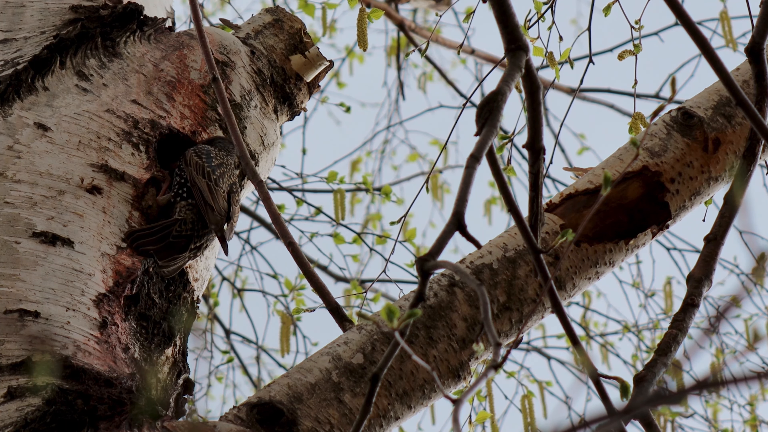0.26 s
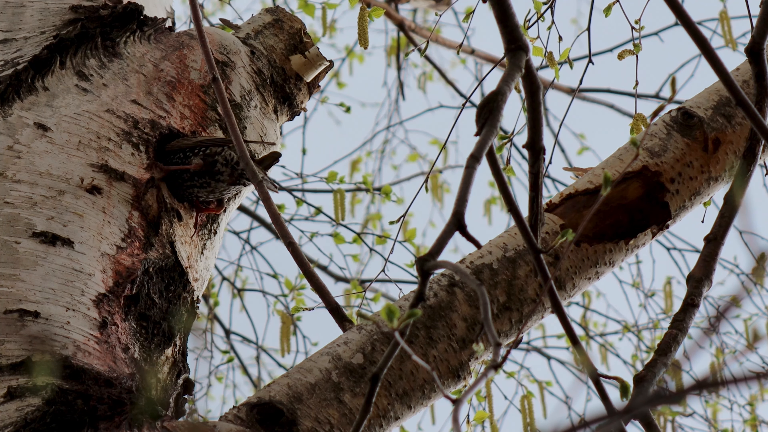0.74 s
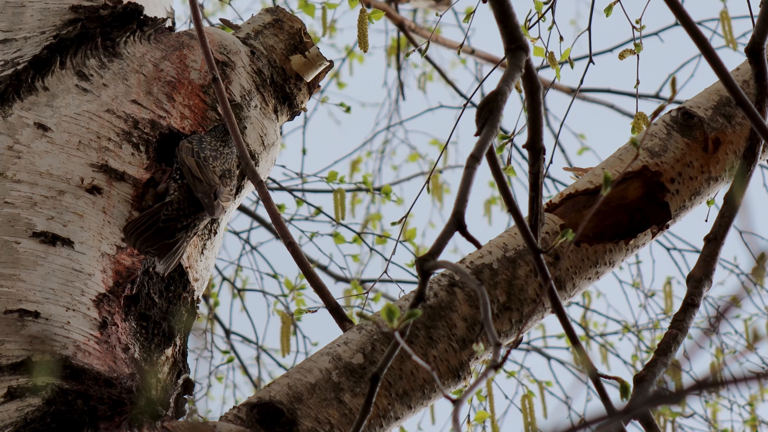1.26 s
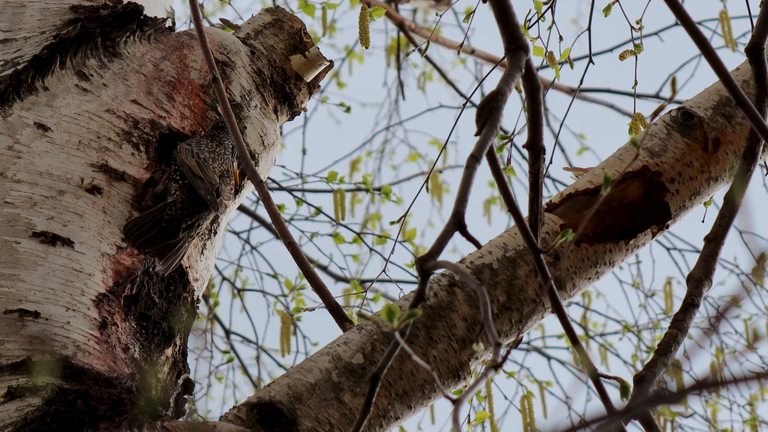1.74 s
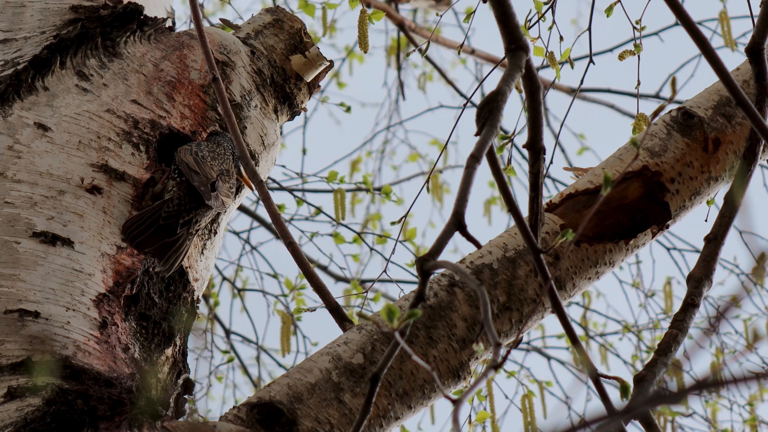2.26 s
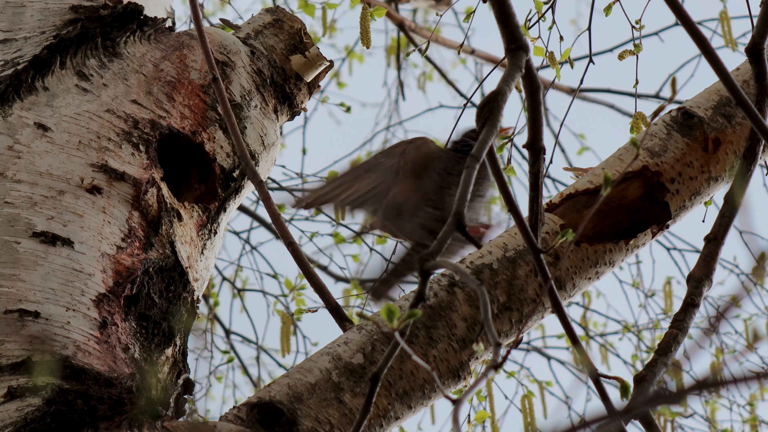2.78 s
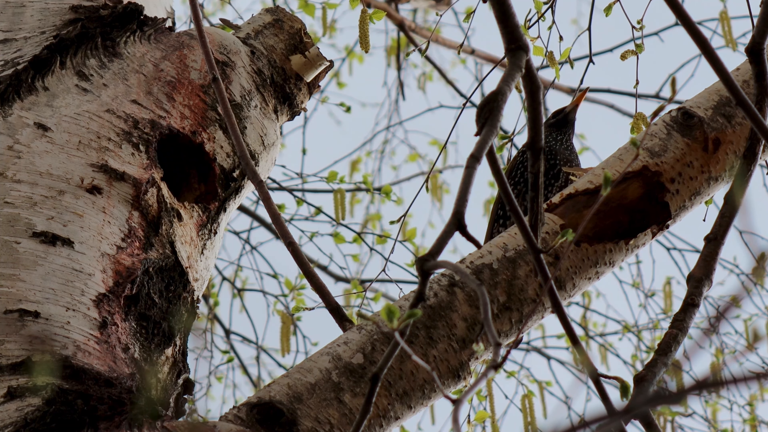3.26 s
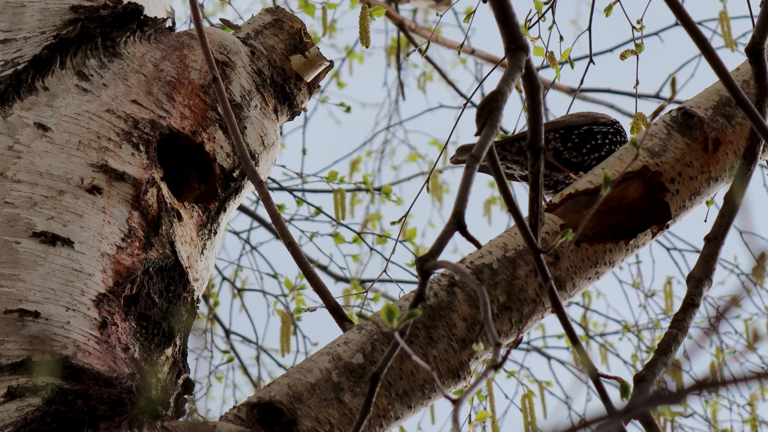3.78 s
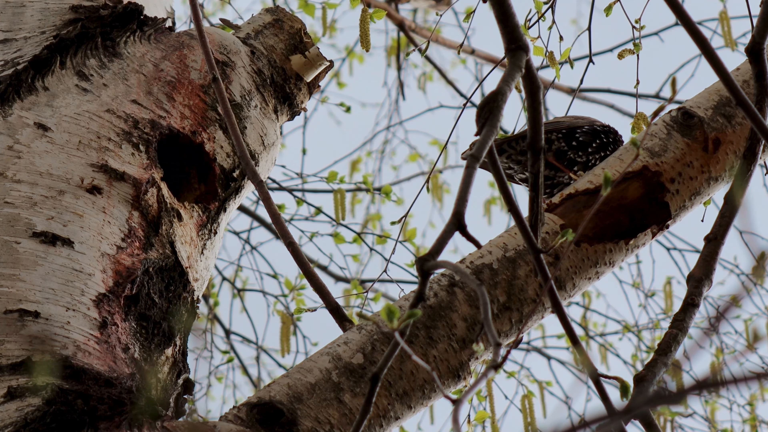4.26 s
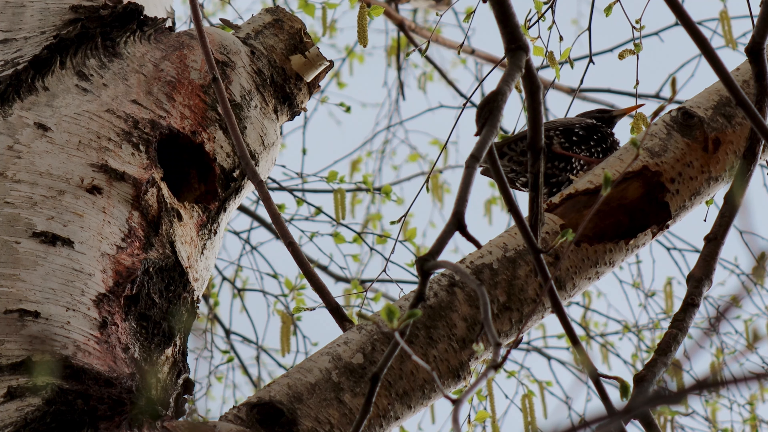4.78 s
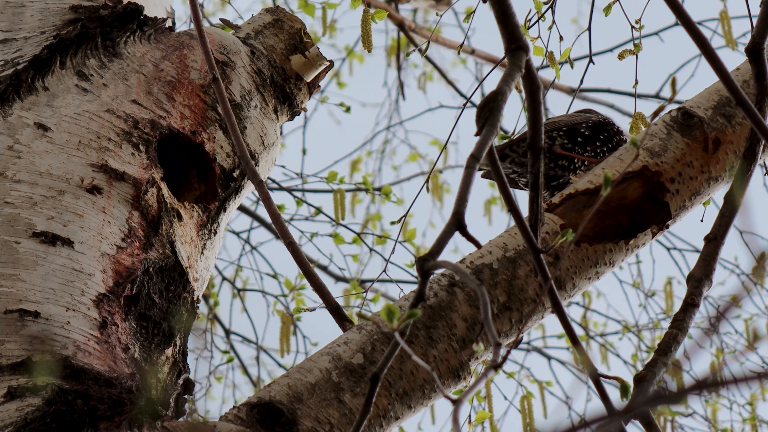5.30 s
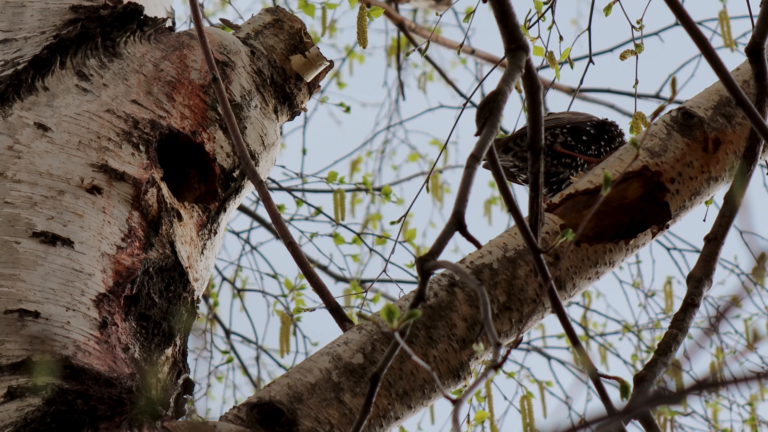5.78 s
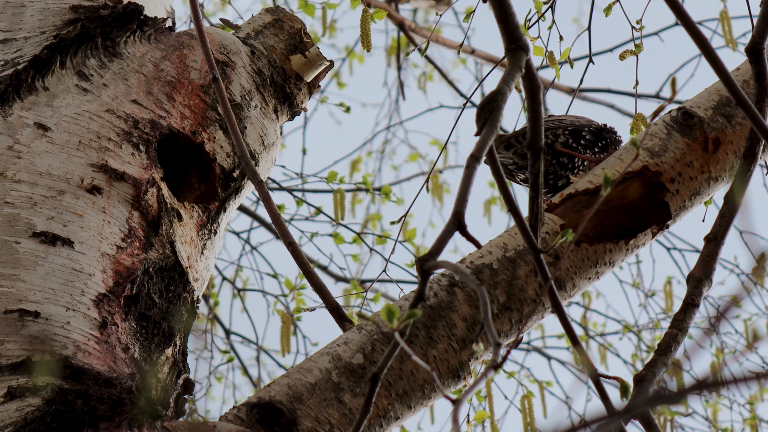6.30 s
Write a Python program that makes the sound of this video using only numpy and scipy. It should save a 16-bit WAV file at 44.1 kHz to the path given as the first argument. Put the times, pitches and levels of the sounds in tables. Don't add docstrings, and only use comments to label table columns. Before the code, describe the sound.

Thin birdsong and low whistles among trees, brief dry claw scratches on a trunk, then insistent descending chirps over very faint distant traffic.

```python
import sys
import numpy as np
from scipy import signal
from scipy.fft import rfft, irfft
from scipy.io import wavfile
from scipy.ndimage import uniform_filter1d

SR = 44100
rng = np.random.default_rng(int(sys.argv[2]) if len(sys.argv) > 2 else 0)


def boost(x):
    u = np.asarray(x, float) / 20
    return 10 ** u


def store_wav(level_fs):
    pcm = np.round(np.clip(np.atleast_2d(level_fs), -1, 1) * 32767)
    wavfile.write(sys.argv[1], SR, pcm.T.astype(np.int16))


N = 288414

# t/s, f/Hz, level/dB
FLUTE_NOTES = [
    [(.672, 2270, -60), (.7, 2250, -53.5), (.725, 1725, -61), (.755, 1450, -71)],
    [(.845, 2410, -60), (.865, 2246, -60), (.89, 2037, -53), (.95, 1941, -56.5), (.99, 1890, -66.5)],
    [(1.165, 1583, -60), (1.23, 1962, -50), (1.275, 2380, -43), (1.305, 2704, -46), (1.345, 2067, -49.5),
     (1.405, 1665, -62.5)],
    [(2.59, 2145, -62), (2.605, 1780, -61), (2.62, 2093, -58.5), (2.7, 1743, -61), (2.77, 1529, -64.5)],
    [(2.772, 2380, -53), (2.79, 2035, -53), (2.815, 1920, -49)],
    [(2.99, 2147, -45), (3.012, 2132, -48), (3.03, 2092, -39), (3.04, 2360, -49), (3.062, 2580, -49.5),
     (3.112, 2030, -49.5), (3.165, 2226, -44.5), (3.198, 2106, -45), (3.25, 2030, -50)],
]
# t/s, f/Hz, level/dB
QUICK_NOTES = [
    [(5.374, 2250, -54.5), (5.405, 2950, -35.5), (5.425, 2934, -35.5), (5.438, 2432, -39.5),
     (5.46, 2882, -36.5), (5.478, 2800, -39), (5.505, 2260, -44), (5.548, 2433, -42.5), (5.578, 2440, -59)],
    [(2.817, 2200, -56), (2.823, 2658, -52.5), (2.836, 2240, -42), (2.856, 1850, -49)],
    [(2.853, 2210, -46), (2.863, 2750, -50.5), (2.876, 2244, -41), (2.886, 2030, -50)],
    [(2.886, 2205, -46), (2.894, 2490, -39.5), (2.908, 2090, -50)],
    [(2.91, 2450, -53), (2.918, 2310, -51), (2.928, 2050, -52)],
]
# t from start/s, f/Hz, level/dB
HELD_SHAPE = [(0, 1706, -9), (0.025, 1921, 4), (.15, 1837, 0.5), (.21, 1758, 0.5), (0.25, 1647, -7)]
# t/s, pitch factor/1, level/dB
HELD_ENTRIES = [
    (3.442, 0.96, -53),
    (3.789, 0.98, -52.5),
    (4.656, 0.96, -51),
    (4.989, 0.95, -50.5),
]
# t from start/s, f/Hz, level/dB
SWOOP_SHAPE = [(0, 2160, -12.5), (.038, 3005, 6), (.052, 2790, 4), (.07, 2244, 1.5), (.09, 2807, 8.5),
               (.108, 2746, 4), (.135, 2225, -9), (0.172, 2430, 2), (0.201, 2415, -16)]
# t/s, pitch factor/1, level/dB
SWOOP_ENTRIES = [
    (4.122, 1.001, -42),
]
# t/s, level/dB, start f/Hz, beak toward the microphone/dB
CHIP_NOTES = [(1.395, -63.5, 3870, 6), (3.424, -51, 4080, 2.5), (3.484, -48.5, 4600, 8),
              (4.392, -47, 4050, 9.5), (4.461, -43, 4300, 4), (4.562, -44.5, 4340, 2.5),
              (4.644, -42, 4320, 3.5), (4.733, -43, 4510, 6.5), (4.828, -42, 4330, 10),
              (5.136, -47, 3930, 1), (5.231, -40.5, 4630, 0.5), (5.312, -39.5, 4380, 5),
              (5.396, -37, 4460, 2), (5.495, -41, 4440, 5), (5.633, -40, 4050, 1.5),
              (5.733, -40.5, 4090, -2), (6.033, -43.5, 3940, -1.5), (6.099, -42.5, 4150, -4.5),
              (6.177, -42, 4046, -4.5), (6.292, -44, 4085, -6.5), (6.513, -43, 3970, -8.5)]
# from t/s, echo delay/s, echo level/dB, share of fall rate/1, loudest at share of length/1
CHIP_PERCHES = [
    (0, .013, -10.5, 1.0, .44),
    (5.1, .0125, -9, 1, 0.37),
    (5.2, 0.011, -2, 0.94, 0.37),
    (5.35, .013, -13, 0.91, 0.37),
    (5.6, .013, -3, .9, 0.38),
    (6.0, .021, -3.5, 0.8, .3),
    (6.25, 0.019, -1.5, .9, 0.38),
]
# t/s, length/s, start f/Hz, end f/Hz, loudest level/dB
SWELLING_GLIDES = [(0.551, 0.12, 2610, 2434, -66), (1.674, 0.02, 3000, 3980, -45.5),
                   (1.103, 0.02, 3820, 4430, -52), (1.575, 0.02, 3920, 3100, -47.5),
                   (1.584, .027, 5000, 4740, -68), (1.706, .01, 4960, 3460, -48),
                   (2.1, .025, 5500, 5640, -61), (2.638, 0.023, 2870, 3440, -47),
                   (3.043, 0.093, 3340, 3350, -70), (3.898, .027, 3150, 4600, -48.5),
                   (4.58, .014, 3520, 4820, -58), (4.724, .014, 3420, 4200, -52),
                   (3.991, 0.02, 4890, 5940, -51), (4.098, 0.014, 4980, 5680, -56.5),
                   (4.591, .035, 2312, 2494, -53.5)]
# t/s, length/s, start f/Hz, end f/Hz, loudest level/dB
FADING_GLIDES = [(5.885, .012, 5600, 5800, -70), (1.122, .02, 4500, 6700, -66),
                 (0.388, 0.032, 5300, 4000, -68), (0.34, 0.09, 6400, 6350, -71),
                 (0, 0.016, 3800, 2600, -48), (.015, .05, 3050, 3030, -58), (.205, .05, 6650, 6600, -75),
                 (5.143, .012, 10100, 8800, -67), (.4, 0.11, 3950, 4050, -62.5),
                 (.597, .016, 4200, 2700, -62), (1.17, .05, 2900, 2550, -55), (.075, .16, 3050, 3030, -67),
                 (.097, .03, 4300, 3500, -63), (3.7, .035, 3300, 2300, -56), (2.635, .03, 3900, 3000, -56),
                 (1.7, 0.028, 2940, 2400, -58), (1.724, 0.01, 5050, 3700, -51),
                 (1.617, .01, 4900, 3600, -56), (1.606, .008, 4900, 3900, -58),
                 (2.03, 0.027, 4240, 4600, -57), (4.366, 0.022, 2480, 2000, -60),
                 (4.39, .06, 1950, 1900, -63), (4.545, 0.04, 2400, 2350, -61),
                 (4.745, 0.17, 2230, 2272, -61), (4.243, .014, 4300, 3400, -58),
                 (5.17, .05, 3050, 3100, -65), (6.043, .014, 6500, 4800, -74),
                 (1.005, .05, 4100, 4050, -57), (1.399, .01, 11000, 9800, -64), (.72, .03, 3800, 4100, -63),
                 (.74, .03, 2900, 3300, -61), (6.423, .012, 4900, 3700, -58), (6.44, .025, 4000, 4300, -58),
                 (6.312, .014, 2700, 1950, -62), (6.333, .014, 2700, 1950, -62),
                 (2.463, .02, 4500, 2800, -54)]
# t/s, length/s, top f/Hz, level/dB, gain from start to end/dB
ARCH_NOTES = [(1.126, 0.045, 3350, -56, 4), (1.707, 0.051, 4124, -54.5, -5), (2.603, 0.055, 4170, -61, 4),
              (2.62, 0.038, 6120, -66.5, 0), (4.138, .042, 4410, -70.5, -2), (4.2, 0.042, 4250, -59.5, 3),
              (4.349, .035, 3890, -56.5, -2), (5.449, 0.038, 4390, -56.5, 2), (5.95, .03, 4600, -58, -6),
              (6.404, 0.03, 4330, -66, 5)]
# t from start/s, f/Hz, level/dB
HOOK_SHAPE = [(0, 3285, -15), (.01, 4807, -4), (.03, 4764, -2), (.037, 4150, 1), (.048, 2863, -7)]
# t/s, pitch factor/1, level/dB
HOOK_ENTRIES = [(.985, 1.17, -68), (2.436, 1.03, -61.5), (3.113, 1.095, -62), (3.587, 1.05, -63.5),
                (4.298, .99, -62), (4.927, 1.06, -61), (5.891, 1.066, -59)]
# t from start/s, f/Hz, level/dB
ZIGZAG_SHAPE = [(0, 4252, -3), (.017, 3092, 0), (.041, 3800, -2.5), (.066, 2688, -2)]
# t/s, pitch factor/1, level/dB, length factor/1
ZIGZAG_ENTRIES = [(1.048, 0.95, -63, 1.02), (2.495, 1.02, -51.5, .95), (3.183, 1.015, -54, 1),
                  (3.648, 1.03, -56, 1.2), (4.998, .97, -59, 1.6), (5.962, 0.99, -54.5, 1.22)]
# t from start/s, f/Hz, level/dB
ZIP_SHAPE = [(0, 4500, -2), (.012, 8550, -7), (.02, 8400, -10), (.03, 5300, 10)]
# t/s, pitch factor/1, level/dB
ZIP_ENTRIES = [(1.745, 0.96, -68), (1.79, 1.02, -72), (1.845, 1.01, -70), (1.863, 0.82, -72)]
# t/s, f/Hz, level/dB
FLOURISH_NOTES = [
    [(1.965, 3910, -70), (1.99, 3964, -52), (2.04, 4910, -57.5), (2.05, 5420, -65), (2.1, 5500, -65)],
    [(2.105, 5460, -55), (2.135, 2344, -56), (2.15, 2515, -57), (2.2, 2424, -60.5)],
    [(2.125, 5200, -56), (2.145, 3393, -54), (2.2, 3200, -63), (2.25, 3330, -96)],
]
# start t/s, end t/s, start f/Hz, end f/Hz, level/dB, beat rate/Hz, pitch swing share/1
TRILL_NOTES = [
    (1.59, 1.695, 3170, 3300, -51.5, 72, 0.072),
    (2.555, 2.62, 2650, 2620, -50.5, 84, 0.024),
    (1.752, 1.775, 3000, 3950, -63, 20, 0.02),
    (.555, 1.2, 5100, 5250, -78.5, 160, 0.046),
    (0, 0.031, 5200, 5100, -62.5, 109, 0.05),
]
# start t/s, end t/s, lowest f/Hz, highest
# f/Hz, level/dB
TWITTER_BURSTS = [(0, 0.017, 2200, 3600, -54.5), (0.045, 0.44, 2787, 4320, -76), (.12, .2, 3600, 4450, -61),
                  (.2, .4, 3300, 4100, -75), (0.396, 0.5, 3600, 5400, -61), (.5, 0.58, 3030, 4600, -65.5),
                  (.595, .72, 2050, 4400, -61.5), (4.134, 4.278, 1830, 2100, -66.5),
                  (5.394, 5.552, 1960, 2440, -61), (4.97, 5.03, 2360, 2850, -63),
                  (0.56, 0.78, 4000, 5500, -68), (0.739, 0.88, 3940, 5900, -65.5),
                  (0.712, 0.892, 2750, 4400, -60), (0.904, 1.006, 2800, 4700, -63),
                  (0.985, 1.09, 3500, 5400, -59.5), (1.09, 1.172, 3000, 5400, -58),
                  (1.141, 1.24, 2150, 4260, -56), (2.156, 2.267, 2100, 3100, -68),
                  (2.78, 2.94, 1850, 2950, -58), (1.68, 1.77, 2300, 4400, -65.5),
                  (1.583, 1.69, 3600, 5300, -70.5), (2.6, 2.78, 1700, 2600, -64.5),
                  (2.456, 2.581, 3300, 4950, -58), (2.581, 2.784, 2300, 4770, -58.5),
                  (3.126, 3.266, 2480, 5120, -59.5), (3.46, 3.53, 3100, 5150, -59),
                  (3.609, 3.699, 3400, 5160, -57), (3.68, 3.76, 2260, 5300, -57),
                  (3.52, 3.601, 3000, 3900, -66.5), (3.734, 3.788, 4940, 6300, -60.5),
                  (3.76, 3.892, 2500, 6600, -62), (4.353, 4.535, 2840, 4340, -56.5),
                  (4.571, 4.611, 3500, 5100, -56), (4.961, 5.061, 3360, 4950, -54.5),
                  (5.04, 5.121, 2900, 4600, -60.5), (5.399, 5.436, 4700, 7000, -63.5),
                  (5.45, 5.507, 6750, 7440, -76.5), (5.922, 5.985, 3200, 5100, -51.5),
                  (5.98, 6.07, 3200, 4900, -60), (4.22, 4.35, 2700, 4800, -62),
                  (5.335, 5.395, 3300, 4700, -61), (.84, .89, 1500, 2100, -62),
                  (5.938, 5.988, 1940, 3400, -66), (6.427, 6.5, 2170, 4950, -60.5)]
# t/s, tick level/dB, knock level/dB, left over right/dB, tick f/Hz
CLAW_STRIKES = [(0.7444, -49, -74, 1, 9500), (0.836, -53, -63, 4, 9500), (1.317, -41, -70, 1, 10800),
                (1.376, -40.5, -68, -5, 11100), (1.398, -42, -79, -1, 11000), (2.7725, -54, -96, 8, 8000),
                (2.864, -57, -62, 5.5, 12500), (2.944, -50, -73, -2, 12500), (2.9464, -35, -46, -3, 6000),
                (2.958, -52, -56.5, -3, 5000), (2.98, -52, -54.5, 0, 5500), (2.971, -51, -54, 5, 7000),
                (2.9913, -58, -53.5, -3.5, 12000), (3.754, -55, -59, 1, 11000),
                (3.768, -46.5, -61, -5, 11000), (3.7964, -49, -63, -4, 11000), (3.81, -45, -50, -5, 10000),
                (3.8453, -38, -46.5, -2, 9100), (3.87, -66, -52, 9, 10000), (4.912, -51, -72, -2, 6000),
                (5.137, -58, -60, -2.5, 10800)]
# loudest t/s, rise/s, fall/s, level/dB, centre f/Hz
RUSTLE_STROKES = [
    (.752, 0.049, 0.14, -74.5, 9800),
    (1.382, 0.096, 0.069, -66, 11000),
    (2.796, 0.15, .03, -66, 9300),
    (2.865, 0.025, 0.047, -68, 12500),
    (2.944, 0.016, 0.097, -63, 9180),
    (3.775, .035, .16, -67, 11900),
    (5.142, 0.014, 0.022, -67, 10800),
    (5.3, 0.12, 0.39, -77, 10850),
]
# f/Hz, level/dB per Hz
MURMUR_SPECTRUM = [(40, -49), (161, -29.5), (460, -1.5), (1070, -1), (2200, -7), (5200, -11.5), (8740, -22),
                   (16000, -23.5)]
# f/Hz, likeness/1
MURMUR_LIKENESS = [(100, 0.13), (250, 0.77), (500, 0.69), (1000, 0.027), (3000, -0.22), (12000, 0.062)]
# f/Hz, left over right/dB
MURMUR_LEAN = [(50, 4), (150, 0), (600, 1.2), (1500, 0), (12000, -1.5)]


def flute():
    track = np.zeros(N)
    for note in FLUTE_NOTES:
        whistle(track, note, fade_s=0.0032, round_s=0.025, wobble=0.013, overtone_db=-42)
    for note in placed(HELD_SHAPE, HELD_ENTRIES):
        whistle(track, note, fade_s=0.01, round_s=0.027, wobble=0.015, overtone_db=-44,
                beats=57, swing=0.042, beat_db=3.5)
    for note in placed(SWOOP_SHAPE, SWOOP_ENTRIES) + QUICK_NOTES:
        whistle(track, note, fade_s=0.0036, round_s=0.009, wobble=0.0041, overtone_db=-43.5)
    return garden(track, pan_db=-11, lag_s=.0002, wet_db=-1.5, t60=.17, echo_s=.023, echo_db=-7.5)


def chips():
    fall_hz_per_s, end_hz = 76000, 2750
    soft_db, deeper_hz_per_db = -50.5, 42
    track, wall = np.zeros((2, N))
    perch_s, delay_s, echo_db, pace, swell = np.transpose(CHIP_PERCHES)
    for s, level_db, hz, _ in CHIP_NOTES:
        fall_hz = hz - end_hz + deeper_hz_per_db * max(level_db - soft_db, 0)
        perch = np.searchsorted(perch_s, s) - 1
        length = fall_hz / fall_hz_per_s / pace[perch]
        note = np.array([
            (s, hz, level_db - 15.5),
            (s + swell[perch] * length, hz - swell[perch] * fall_hz, level_db + 0.5),
            (s + length, hz - fall_hz, level_db - 18)])
        whistle(track, note, fade_s=0.0018, round_s=0.003, wobble=0.004, overtone_db=-42.5)
        if s + delay_s[perch] < N / SR - .003:
            echo = note + [delay_s[perch], 0, echo_db[perch]]
            whistle(wall, echo, fade_s=0.0036, round_s=0.003, wobble=0.0082, overtone_db=-50)
    table = np.array(CHIP_NOTES)
    middles, beak_db = table[:, 0] + 0.017, table[:, -1]
    facing = boost(np.interp(np.arange(N) / SR, middles, beak_db))
    heard = garden(track, pan_db=-4.5, lag_s=-.00005, wet_db=-0.5, t60=0.14,
                   echo_s=0.028, echo_db=-18.0, facing=facing)
    return boost(2.0) * (heard + wall * boost([[.5], [-5.5]]))


def warbler():
    track = np.zeros(N)
    notes = [[(s, a_hz, db - 8), (s + length, b_hz, db)] for s, length, a_hz, b_hz, db in SWELLING_GLIDES]
    notes += [[(s, a_hz, db), (s + length, b_hz, db - 7.5)] for s, length, a_hz, b_hz, db in FADING_GLIDES]
    notes += [arch(*row) for row in ARCH_NOTES]
    notes += [note * [1, 0.79, 1] + [0, 0, -2] for note in placed(HOOK_SHAPE[1:3], HOOK_ENTRIES)]
    notes += placed(HOOK_SHAPE, HOOK_ENTRIES) + placed(ZIGZAG_SHAPE, ZIGZAG_ENTRIES)
    notes += placed(ZIP_SHAPE, ZIP_ENTRIES) + FLOURISH_NOTES
    for note in notes:
        whistle(track, note, fade_s=0.0034, round_s=.008, wobble=0.014, overtone_db=-31.5)
    for start, end, from_hz, to_hz, level_db, beats, swing in TRILL_NOTES:
        note = [(start, from_hz, level_db), (end, to_hz, level_db)]
        whistle(track, note, fade_s=0.007, round_s=.001, wobble=0.0153, overtone_db=-33.0,
                beats=beats, swing=swing, beat_db=-2)
    return garden(track, pan_db=-13, lag_s=0.0002, wet_db=2.5, t60=0.15, echo_s=0.032, echo_db=-20.0)


def arch(s, length, hz, level_db, gain_db):
    start, end, turn = .8, .79, .46
    u = np.linspace(0, 1, 9)
    rising = (1 - start) * (1 - u / turn) ** 2
    falling = (1 - end) * ((u - turn) / (1 - turn)) ** 2
    sag = np.where(u < turn, rising, falling)
    return np.transpose([s + u * length, hz * (1 - sag), level_db + gain_db * (u - .5)])


def claws():
    s, tick_db, knock_db, pan_db, tick_hz = np.transpose(CLAW_STRIKES)
    t = np.arange(int(0.03 * SR)) / SR
    out = np.zeros((2, N + len(t)))
    spread = 1.47
    hollow = signal.butter(3, [1030, 2500], "band", fs=SR, output="sos")
    splinter = 1.23 * boost(-60 * t / 0.0039) + 0.12 * boost(-60 * t / 0.08)
    for k, at in enumerate((s * SR).astype(int)):
        band_hz = tick_hz[k] * np.array([1 / spread, spread])
        bright = signal.butter(2, band_hz, "band", fs=SR, output="sos")
        crack = rng.standard_normal((2, len(t))) + 1.76 * rng.standard_normal(len(t))
        tick = boost(tick_db[k] - 9.5) * signal.sosfilt(bright, crack * splinter)
        knock = signal.sosfilt(hollow, crack * boost(-60 * t / 0.048))
        knock *= boost(1.2 * (knock_db[k] + 51.5) - 41.0)
        out[:, at:at + len(t)] += (tick + knock) * boost([[pan_db[k] / 2], [-pan_db[k] / 2]])
    return out[:, :N]


def rustle():
    out = np.zeros((2, N))
    for peak_s, rise_s, fall_s, peak_db, hz in RUSTLE_STROKES:
        s = [peak_s - rise_s, peak_s, peak_s + fall_s]
        level_db = peak_db - 13.5 * np.array([1, 0, 1])
        start, size = int(s[0] * SR), int((s[-1] - s[0]) * SR)
        t = (start + np.arange(size)) / SR
        grains = rng.standard_normal((2, size)) * boost(3.9 * drift(100, size))
        broad = signal.sosfilt(signal.butter(1, [2500, 15500], "band", fs=SR, output="sos"), grains)
        narrow = signal.sosfilt(signal.butter(2, 1800, fs=SR, output="sos"), grains)
        bright = narrow * np.sin(2 * np.pi * hz * t)
        mix = rms_one(rms_one(broad) + 0.55 * rms_one(bright))
        level = boost(np.interp(t, s, level_db) + 1.5)
        out[:, start:start + size] += level * mix * signal.windows.tukey(size, .1)
    return out


def chorus():
    track = np.zeros(N)
    for start, end, low_hz, high_hz, level_db in TWITTER_BURSTS:
        at, size = int(start * SR), int((end - start) * SR)
        span = min(1.55, high_hz / low_hz)
        elapsed = np.linspace(0, 1, size)
        bottom_hz = low_hz + (high_hz / span - low_hz) * np.exp(-elapsed / .45)
        top_hz = high_hz * (1 - .28 * elapsed * (span - 1))
        voices = 0
        for _ in range(6):
            place = .5 + 0.65 * np.tanh(0.68 * drift(170, size + 4000)[:size])
            pitch = bottom_hz * (top_hz / bottom_hz) ** place
            syllables = boost(5.5 * drift(100, size + 4000)[:size])
            voices = voices + syllables * np.sin(2 * np.pi * np.cumsum(pitch) / SR)
        level = boost(level_db + 2.0 * drift(13.5, size + 9000)[:size] + 2.9 * drift(90, size))
        ends = signal.windows.tukey(size, min(0.048 * SR / size, .5))
        track[at:at + size] += level * rms_one(voices) * ends
    heard = garden(track, pan_db=-10, lag_s=0, wet_db=3.5, t60=0.22, echo_s=0.017, echo_db=-8.0)
    return boost(-2) * heard


def murmur():
    hz = np.maximum(np.arange(N // 2 + 1) * SR / N, 10)
    mid, side = rfft(rng.standard_normal((2, N))) * boost(at_hz(MURMUR_SPECTRUM, hz))
    alike = np.clip(at_hz(MURMUR_LIKENESS, hz), -1, 1)
    lean = boost(at_hz(MURMUR_LEAN, hz) / 2)
    mid, side = np.sqrt(1 + alike) * mid, np.sqrt(1 - alike) * side
    noise = irfft([(mid + side) * lean, (mid - side) / lean], N)
    return boost(-66.5 + 2.5 + 0.4 * drift(2.24, N)) * rms_one(noise)


def garden(x, pan_db, lag_s, wet_db, t60, echo_s, echo_db, facing=1):
    t = np.arange(int(.6 * SR)) / SR
    sparse = rng.standard_normal((2, len(t))) * (rng.random((2, len(t))) < .06)
    shelf = boost(-60 * (t / t60) ** 1.4)
    tail = boost(-16.5 - 60 * t / 0.89)
    haze = sparse * (shelf + tail) * np.clip(t / 0.0068, 0, 1)
    paths = boost(wet_db) * haze / np.sqrt(np.sum(haze ** 2, axis=1, keepdims=True))
    direct = np.zeros((2, N))
    for ear, delay_s, gain_db in [(0, max(lag_s, 0), pan_db / 2), (1, max(-lag_s, 0), -pan_db / 2)]:
        direct[ear] = boost(gain_db) * np.roll(facing * x, int(delay_s * SR))
        paths[ear, int((echo_s - delay_s) * SR)] += boost(echo_db - gain_db)
    return direct + signal.fftconvolve(x[None], paths, axes=1)[:, :N]


def whistle(track, note, fade_s, round_s, wobble, overtone_db, beats=0, swing=0, beat_db=0):
    s, hz, level_db = np.transpose(note)
    start = int(s[0] * SR)
    t = np.arange(start, min(int(s[-1] * SR) + 2, N)) / SR
    pitch = uniform_filter1d(np.interp(t, s, hz), int(round_s * SR) + 1, mode="nearest")
    beat = np.sin(2 * np.pi * np.cumsum(beats * (1 + 0.1027 * drift(22.4, len(t)))) / SR)
    unsteady = 1 + wobble * drift(99.0, len(t)) + swing * beat
    phase = 2 * np.pi * np.cumsum(pitch * unsteady) / SR
    ends = np.sin(np.pi / 2 * np.clip(np.minimum(t - t[0], t[-1] - t) / fade_s, 0, 1)) ** 2
    flicker_db = 150 * wobble * drift(45, len(t)) + beat_db * beat
    tone = np.sin(phase) + boost(overtone_db) * np.sin(2 * phase)
    level = np.sqrt(2) * boost(np.interp(t, s, level_db) + flicker_db)
    track[start:start + len(t)] += level * ends * tone


def placed(shape, entries):
    return [np.array(shape) * [np.prod(slower), factor, 1] + [s, 0, level_db]
            for s, factor, level_db, *slower in entries]


def drift(rate, size):
    width = max(int(SR / rate / 2), 1)
    slow = rng.standard_normal(size + 4 * width)
    slow = uniform_filter1d(uniform_filter1d(slow, width), width)
    return rms_one(slow[2 * width:2 * width + size])


def rms_one(x):
    return x / np.sqrt(np.mean(x ** 2) + 1e-20)


def at_hz(points, hz):
    point_hz, value = np.transpose(points)
    return np.interp(np.log(hz), np.log(point_hz), value)


def scene():
    return flute() + chips() + warbler() + claws() + rustle() + chorus() + murmur()


def roll_off(x):
    return signal.sosfilt(signal.butter(12, 15780, fs=SR, output="sos"), x)


def record(dry):
    return roll_off(dry)


dry = scene()
out = record(dry)
store_wav(out)
```